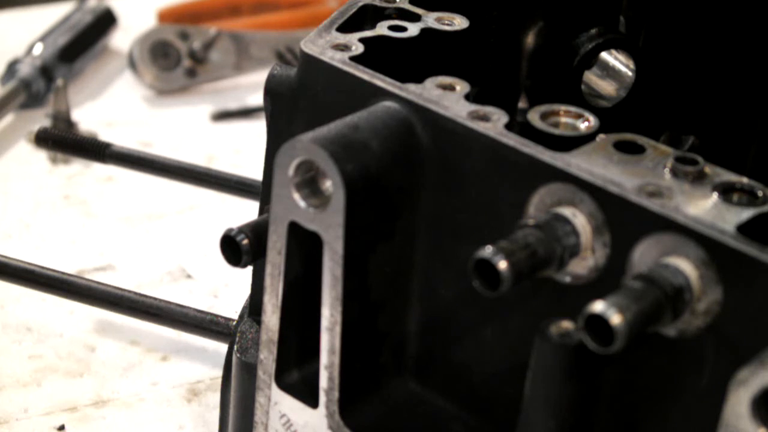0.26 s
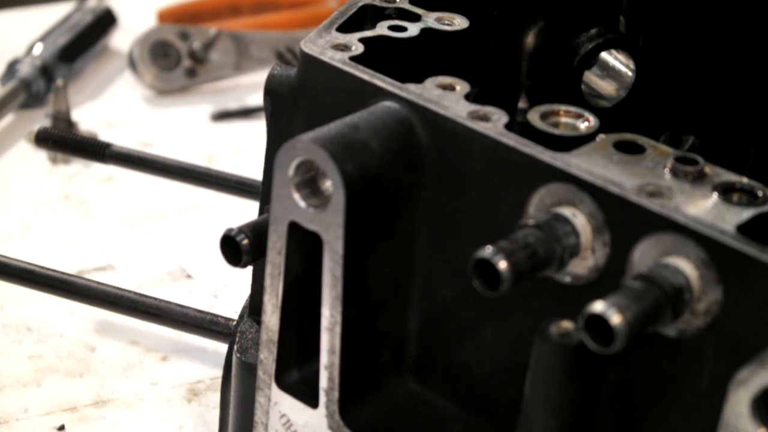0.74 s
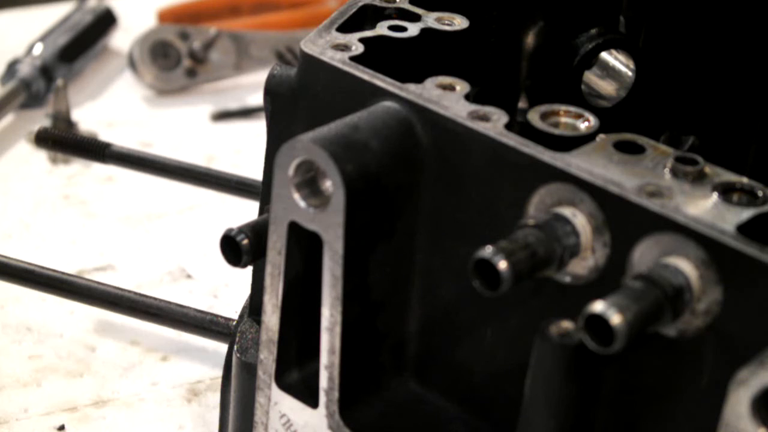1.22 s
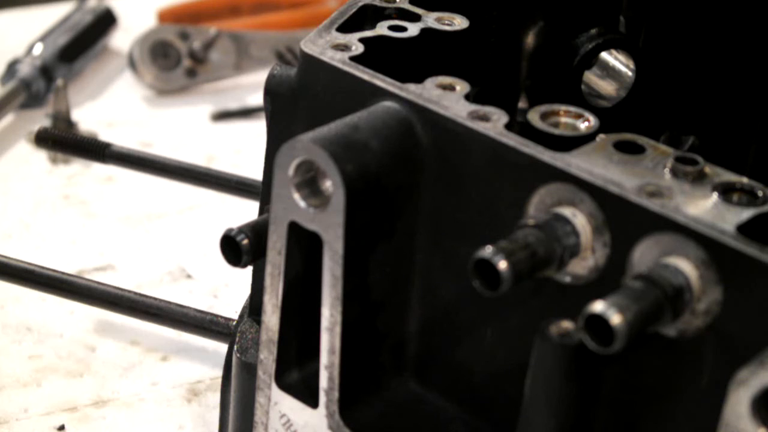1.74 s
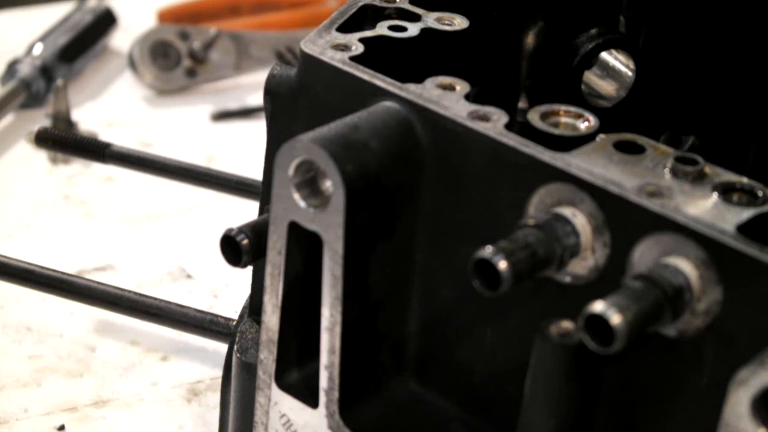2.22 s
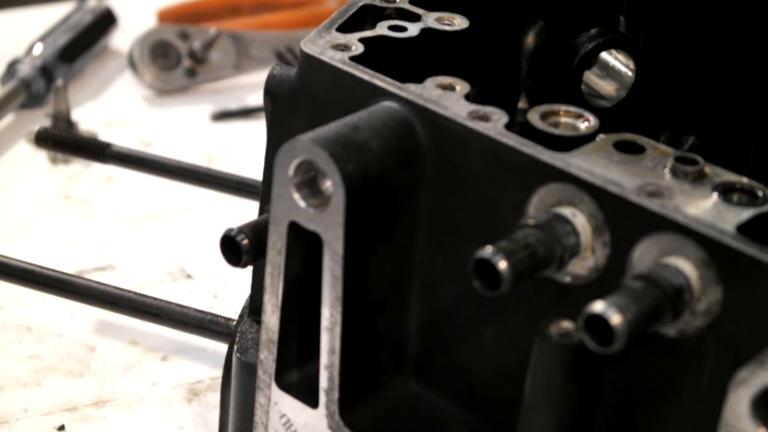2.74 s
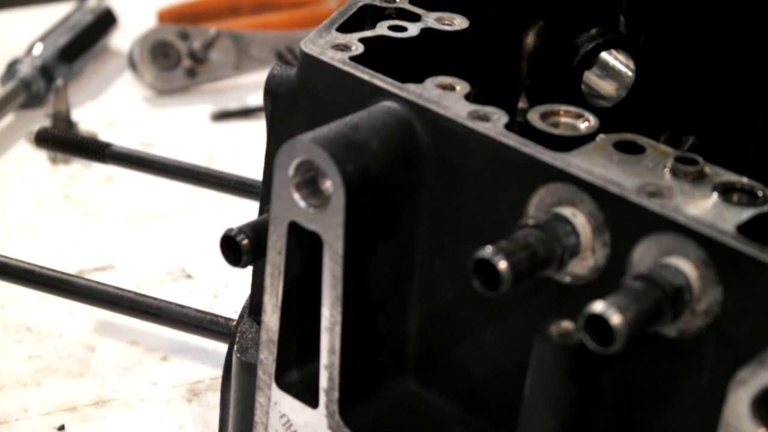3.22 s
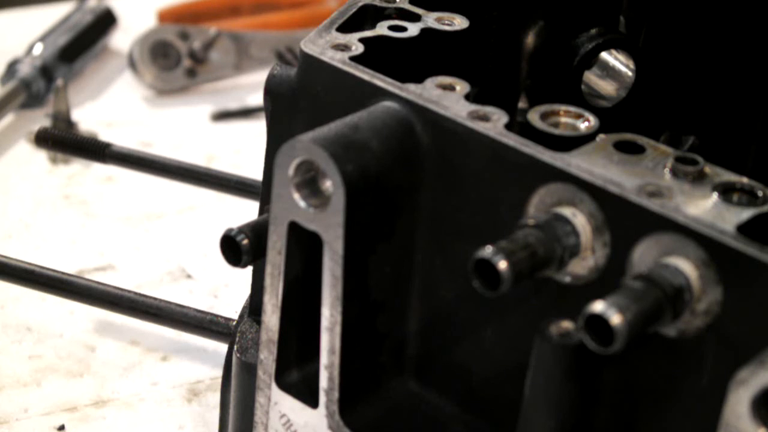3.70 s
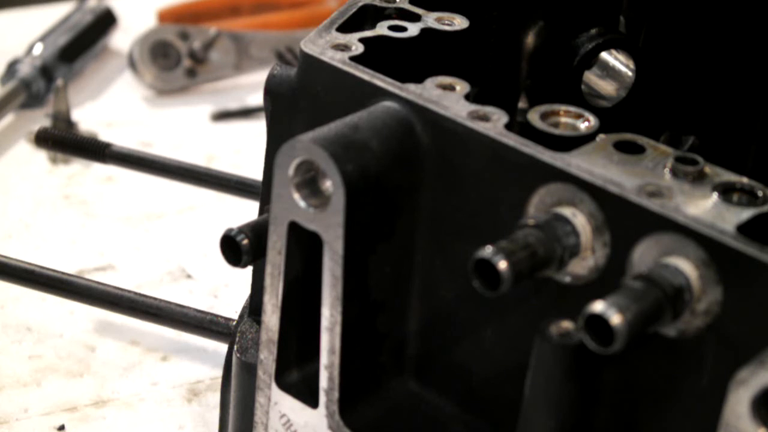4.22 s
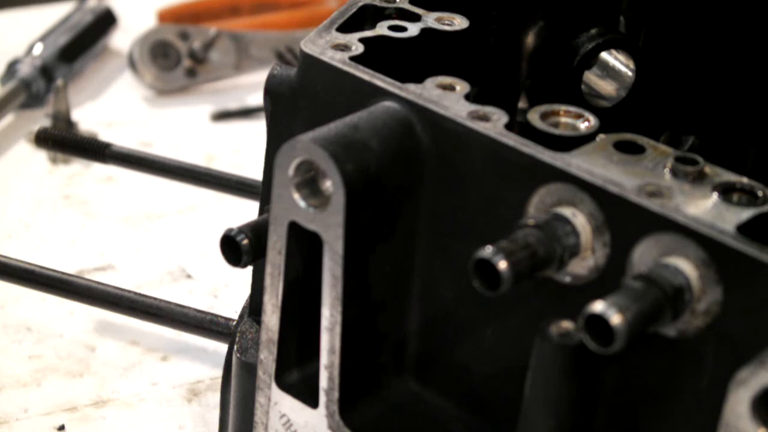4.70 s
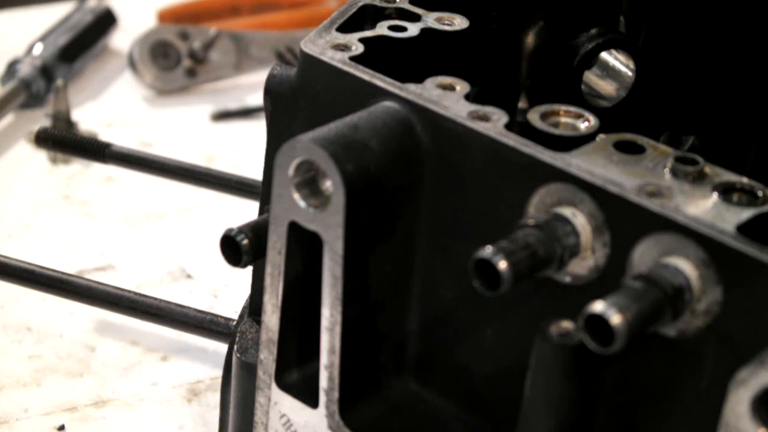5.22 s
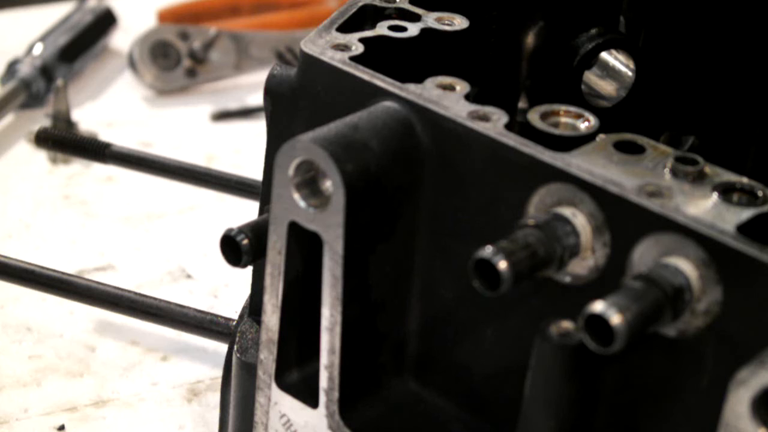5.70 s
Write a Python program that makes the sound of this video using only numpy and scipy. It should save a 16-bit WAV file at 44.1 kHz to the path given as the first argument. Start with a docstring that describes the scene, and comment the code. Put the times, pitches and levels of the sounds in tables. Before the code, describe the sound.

Steel hand tools tap and slide softly on a wooden workbench, then a wrench is struck and a heavy tool lands with a loud, booming clatter that sets loose sockets ringing very high. Light handling follows, then sharper knocks and scrapes, and a last clatter rings the sockets again. Close stereo sound in a small garage, over low rumble and faint hiss.

```python
"""A workbench in a small garage, heard close up on a stereo microphone, over low rumble and faint hiss.
Steel tools tap and slide from 1 s. Near 1.7 s a wrench is struck and a heavy tool lands: the boards
boom and loose sockets chatter and ring very high. Light handling follows, then sharper knocks and
scrapes from about 4 s, and near 5.7 s a last clatter sets the sockets ringing again.
The hard walls answer each blow."""
import sys
import numpy as np
from scipy import signal
from scipy.fft import rfft, irfft, next_fast_len
from scipy.io import wavfile
from scipy.ndimage import map_coordinates

SR = 44100
rng = np.random.default_rng(int(sys.argv[2]) if len(sys.argv) > 2 else 0)


def digitize_waveform(pressure):
    """Quantize a signal to 16-bit integers and store it at the path in sys.argv[1].

    Rows of a 2-D input are taken as channels; values are limited to [-1, 1].
    """
    field = np.atleast_2d(pressure).T
    bounded = np.clip(field, -1, 1)
    quanta = np.round(bounded * 32767).astype(np.int16)
    wavfile.write(sys.argv[1], SR, quanta)


N = 262395

# Colour of a knock on wood: frequency_hz, gain_db
KNOCK_COLOUR = [(170, 6), (470, 5), (1100, 0), (2800, -7.5), (6400, -8), (11500, -14)]
# Tools on the bench; heavier reaches lower, harder higher: start_s, level_db, chatter_s, low_hz, high_hz
TOOL_KNOCKS = [(1.07, -10.5, 0.0034, 1960, 3920), (1.146, -16.5, 0.0062, 725, 14100),
               (1.665, 17.5, 0.017, 470, 12900), (1.776, 15.5, 0.014, 480, 7560),
               (1.7824, 17.5, 0.0092, 110, 18000), (1.812, 12, .075, 500, 3940),
               (1.9621, 10.5, 0.012, 730, 5260), (2.022, -5.5, 0.0096, 584, 4570),
               (2.221, -2, 0.024, 371, 3260), (3.012, -18.5, 0.0036, 1470, 6900),
               (3.269, -11.5, 0.0079, 478, 5600), (3.556, -14, 0.0077, 860, 5600),
               (3.9264, 4, .0016, 1240, 5400), (4.136, -15.5, 0.0039, 517, 5500),
               (4.591, 4, 0.011, 232, 10000), (4.804, 2, .0016, 3680, 4230),
               (4.884, 3.5, 0.0032, 855, 14400), (5.6505, 4.5, 0.0034, 3720, 9400),
               (5.756, -3, 0.0032, 1500, 8000), (5.775, 4.5, .012, 1300, 6200),
               (5.8896, -0.5, 0.00096, 470, 8000)]
def knocks():
    """Tools land on the bench; weight and hardness set the band that each blow excites."""
    out, hz = np.zeros((2, N)), np.geomspace(100, 15000, 24)
    for start_s, level_db, chatter_s, low_hz, high_hz in TOOL_KNOCKS:
        band_db = -10 * np.log10((1 + (low_hz / hz) ** 4) * (1 + (hz / high_hz) ** 4))
        colour = list(zip(hz, level_db + along(KNOCK_COLOUR, hz) + band_db))
        heard = garage(blow(chatter_s, first_s=0.00038), near_db=1, near_s=0.0043, tail_db=3)
        add(out, start_s, bench(heard, colour))
    return out


# Colour of a snap on steel: frequency_hz, gain_db
SNAP_COLOUR = [(200, -21.5), (400, -16), (560, -3), (708, -6), (1020, -0.5), (1630, -3.5), (2420, 1),
               (3120, -5), (4200, -4.5), (5600, -17), (9550, -23), (12100, -24), (15000, -29)]
# Modes of the wrench: pitch_hz, level_db, t60_s
WRENCH_MODES = [(1003, -11.5, .4), (1076, -3.5, .2), (1882, 3.5, 0.21), (1950, 0.5, 0.35), (2070, -4, 0.32),
                (2380, -8, 0.68), (2570, -8, 0.41), (2860, -11.5, 0.74), (3870, -16, 0.23),
                (5040, -10.5, .25)]
# Wrench on steel: start_s, snap_db, ring_db, chatter_s, tilt_db_per_octave
WRENCH_STRIKES = [(1.667, 10.5, -48.5, 0.0048, -6.5), (5.098, 11.5, -60, 0.003, 1),
                  (5.676, 14.5, -64, 0.0038, 1.5), (5.714, -3, -74, 0.0071, -5.5)]
def wrench():
    """Hard steel contacts snap with almost no chatter and leave the wrench ringing briefly."""
    out = np.zeros((2, N))
    for start_s, snap_db, ring_db, chatter_s, tilt in WRENCH_STRIKES:
        taps = blow(chatter_s, first_s=0.0004)
        snap = garage(taps, near_db=0, near_s=0.0063, tail_db=-2)
        colour = [(hz, snap_db + db + tilt * np.log2(hz / 2000)) for hz, db in SNAP_COLOUR]
        add(out, start_s, bench(snap, colour))
        drive = garage(taps, near_db=12, near_s=0.0035, tail_db=-17.5)
        ring = sum(amp(db) * ringing(drive, hz, t60_s) for hz, db, t60_s in WRENCH_MODES)
        add(out, start_s, amp(ring_db) * ring)
    return out


# Modes of the loose sockets: pitch_hz, level_db, t60_s
SOCKET_MODES = [(7591, 0, .25), (7752, -14, .4), (8639, 1, .65), (9600, -9, .68), (9887, 0, .22),
                (10320, -10, .18), (10440, -11, .2), (10740, -13, .3), (10960, -4, .25), (11100, -2, .28),
                (11360, -10, .25), (11475, -3, .17), (13265, -2, .22), (13460, -7, .15), (13835, -1, .29),
                (14030, -4, .25), (14390, -9, .16)]
# Sockets touching: start_s, level_db, chatter_s, brightest_hz, spread_hz
SOCKET_TOUCHES = [(1.829, -52, 0.09, 12400, 1500), (1.849, -52.5, .014, 7600, 300),
                  (1.868, -50, 0.032, 9230, 450), (1.891, -48, .01, 13040, 500),
                  (1.894, -48, 0.021, 10480, 700), (3.012, -67.5, .0038, 13250, 150),
                  (5.755, -47.5, 0.014, 12430, 1290), (5.774, -48.5, .0067, 10280, 600)]
def sockets():
    """Sockets buzz while pressed together, then ring free; where they touch decides which modes sound."""
    out, t = np.zeros((2, N)), np.arange(SR) / SR
    for start_s, level_db, chatter_s, brightest_hz, spread_hz in SOCKET_TOUCHES:
        taps = contacts(np.exp(-t / chatter_s), per_second=3000, scatter_db=0.5)
        heard = garage(taps, near_db=9.5, near_s=0.0031, tail_db=-1)
        for hz, mode_db, t60_s in SOCKET_MODES:
            share = np.exp(-0.5 * ((hz - brightest_hz) / spread_hz) ** 2)
            if share > 0.01:
                buzz_db = -7.5 + 21.5 * np.log2(hz / 12000)  # the high modes buzz most
                buzz = amp(buzz_db) * ringing(heard, hz, t60_s=0.1)
                free_ring = ringing(heard, hz, t60_s)
                add(out, start_s, amp(level_db + mode_db) * share * (free_ring + buzz))
    return out


# Colour of steel scraping the bench: frequency_hz, gain_db
SLIDE_COLOUR = [(170, 3.5), (470, 1.5), (1100, 3), (2800, -10.5), (6400, -10.5), (11500, -14.5)]
# Tools pushed along: fastest_s, half_length_s, level_db, tilt_db_per_octave
TOOL_SLIDES = [(1.006, 0.037, -24, 3.5), (1.545, 0.057, -13.5, -1), (3.216, 0.076, -15.5, .6),
               (4.31, 0.033, -18, -1.5), (4.624, .022, 6, 4), (4.77, .07, -19, 3), (4.885, .005, -3, 3.5),
               (4.985, 0.078, -7.5, 1.5)]
def slides():
    """Steel catches on the bench in dense grains that swell and fade with the push."""
    out = np.zeros((2, N))
    for fastest_s, half_s, level_db, tilt in TOOL_SLIDES:
        grains = contacts(push(half_s), per_second=3500, scatter_db=2.5)
        heard = garage(grains, near_db=0.5, near_s=0.0032, tail_db=0)
        colour = [(hz, level_db + db + tilt * np.log2(hz / 1100)) for hz, db in SLIDE_COLOUR]
        add(out, fastest_s - 3 * half_s, bench(heard, colour))
    return out


LANDING_S = 1.779
# Modes of the bench top: pitch_hz, level_db, t60_s
BOARD_MODES = [(137.6, -14, 1), (166.6, -13.5, 0.82), (291, -8, 0.44), (329, -13.5, 0.59), (692, -4, 0.49),
               (738, 6, 0.15)]
def boards():
    """The low modes of the bench top boom under a heavy landing, centred between left and right."""
    out, t = np.zeros((2, N)), np.arange(SR) / SR
    boom = sum(amp(db - 60 * t / t60_s) * np.sin(2 * np.pi * (hz * t + rng.random()))
               for hz, db, t60_s in BOARD_MODES)
    attack = 1 - np.exp(-t / 0.0021)
    add(out, LANDING_S, np.tile(amp(-20.5) * boom * attack, (2, 1)))
    return out


# Hollow notes of the nudged bench: peak_s, level_db comes last, after the pitch
BENCH_NUDGES = [(1.157, 201, -64), (1.199, 142.4, -59), (1.348, 250.4, -65.5), (2.19, 445, -62.5),
                (3.282, 445, -68), (3.94, 455, -67.5), (4.273, 450.4, -70), (4.604, 493.7, -53.5)]
def nudges():
    """A soft rubbing push swells one low resonance of the bench and lets it go."""
    out = np.zeros((2, N))
    for peak_s, pitch_hz, level_db in BENCH_NUDGES:
        half_s = 4.5 / pitch_hz  # slower pushes wake lower notes
        rub = push(half_s) * diffuse(ECHO_LIKENESS, SR)
        soft_rub = filtered(rub, lambda hz: 1 / (1 + (hz / (2 * pitch_hz)) ** 4))
        add(out, peak_s - 3 * half_s, amp(level_db) * ringing(soft_rub, pitch_hz, t60_s=0.17))
    return out


def blow(chatter_s, first_s):
    """A first impact worth first_s of chatter, then the tool chatters to rest."""
    t = np.arange(SR // 4) / SR
    taps = contacts(np.exp(-t / chatter_s), per_second=5500, scatter_db=0) * np.sqrt(chatter_s / first_s)
    taps[0] += 1
    return taps / np.linalg.norm(taps)


def push(half_s):
    """A bell-shaped force that peaks three half lengths in."""
    t = np.arange(SR) / SR
    return np.exp(-(t / half_s - 3) ** 2)


def contacts(force, per_second, scatter_db):
    """Tiny random impacts sized by a force curve; total energy 1."""
    n = len(force)
    hits = (rng.random(n) < per_second / SR) * rng.choice([-1, 1], n)
    taps = hits * amp(scatter_db * rng.standard_normal(n)) * force
    return taps / (np.linalg.norm(taps) + 1e-12)


# Resonances and gaps of bench and tools: centre_hz, width_hz, gain_db
BENCH_RESONANCES = [(313, 16, 9.5), (356, 8.2, -6.5), (449, 26, 7.5), (584, 10, 4), (650, 64, -1),
                    (1010, 34, 4.5), (1172, 38, 3.5), (1303, 44, 3.5), (1576, 100, -8.5), (1810, 11, 1),
                    (2000, 8.4, 3.5), (2646, 180, 3), (3180, 78, -5.5), (3870, 260, 2), (4770, 230, -4.5),
                    (5170, 100, 3.5)]
def bench(x, colour):
    """Shape a contact by its broad colour and the bench resonances, with no deep bass."""
    hz = np.fft.rfftfreq(SR, 1 / SR)
    db = along(colour, hz)
    for centre_hz, width_hz, gain_db in BENCH_RESONANCES:
        db += gain_db * np.exp(-0.5 * ((hz - centre_hz) / width_hz) ** 2)
    # each point of contact favours different small modes
    db += 2.2 * map_coordinates(rng.standard_normal(SR // 80), [hz / 45]) - 0.6
    low_cut = 1 / np.sqrt(1 + (150 / (hz + 1)) ** 8)
    # minimum phase, so nothing sounds ahead of the contact
    cepstrum = irfft(np.log(amp(db) * (low_cut + 0.014) + 1e-6), SR)
    fold = np.r_[1, np.full(SR // 2 - 1, 2), np.zeros(SR - SR // 2)]
    response = irfft(np.exp(rfft(cepstrum * fold)), SR)
    return signal.fftconvolve(x, response[None, :SR // 8], axes=1)


# Left-right agreement of echoes at the microphone: frequency_hz, likeness
ECHO_LIKENESS = [(100, 0.97), (500, 0.94), (1000, 0.79), (2000, 0.49), (4000, 0.11), (8000, .15),
                 (14000, 0.086)]
# Decay between the hard walls: frequency_hz, t60_s
GARAGE_DECAY = [(150, 0.81), (500, 0.46), (1400, 0.45), (3700, 0.42), (9000, 0.37), (15000, 0.19)]
def garage(taps, near_db, near_s, tail_db):
    """Direct taps reach the microphone with quick echoes off nearby surfaces and the room's tail."""
    power = np.pad(taps, (0, SR - len(taps))) ** 2  # echoes add up in energy
    hz, t, noise = signal.stft(diffuse(ECHO_LIKENESS, SR), SR, nperseg=256)
    frame_energy = np.bincount(np.arange(SR) // 128 + 2, power)  # the walls answer two frames late
    decay = amp(-120 * t / along(GARAGE_DECAY, hz)[:, None])
    room_energy = signal.fftconvolve(frame_energy[None], decay, axes=1)[:, :len(t)]
    tail = signal.istft(noise * np.sqrt(abs(room_energy)), SR, nperseg=256)[1][:, :SR]
    near_energy = signal.lfilter([1], [1, -np.exp(-2 / (near_s * SR))], power)
    near = diffuse(ECHO_LIKENESS, SR) * np.sqrt(near_energy)
    heard = (amp(near_db) * unit(near) + amp(tail_db) * unit(tail)) / np.sqrt(SR)
    heard[:, :len(taps)] += taps
    return unit(heard) / np.sqrt(SR)


# Colours of the building's rumble and of the hiss: frequency_hz, gain_db
RUMBLE_COLOUR = [(12, -32.5), (20, 3), (43, -1.5), (65, -12), (92, -8.5), (156, -10), (202, -14),
                 (221, -23.5), (330, -37), (430, -56), (730, -120)]
HISS_COLOUR = [(150, -29), (250, -3.5), (371, -8.5), (404, -1), (433, -8.5), (774, -11), (1020, -12.5),
               (1390, -15), (1590, -23.5), (1990, -15), (3270, -20), (3620, -18.5), (11000, -20),
               (15000, -21.5)]
# Drifting base level under both: time_s, level_db
ROOM_TONE_DRIFT = [(0.15, -65), (0.65, -68.5), (1.42, -70), (2.5, -67), (3.45, -73.5), (3.83, -73.5),
                   (4.2, -68), (4.5, -70), (5.45, -65.5)]
def room_tone():
    """A lumpy low rumble of the building and a soft, wide hiss drift up and down together."""
    t = np.arange(N) / SR
    drift_db = np.interp(t, *np.transpose(ROOM_TONE_DRIFT))
    lumps_db = 1.7 * map_coordinates(rng.standard_normal(100), [t * 12], mode="mirror")
    narrow = diffuse([(30, 0.86), (150, 0.82)], N)
    rumble = unit(filtered(narrow, lambda hz: amp(along(RUMBLE_COLOUR, hz))))
    wide = diffuse([(300, 0.36), (1500, 0.2), (5000, 0.3), (12000, 0.29)], N)
    hiss = unit(filtered(wide, lambda hz: amp(along(HISS_COLOUR, hz))))
    # the heavy landing shakes the bench and swells the rumble
    shake_db = 7 * (t > LANDING_S) * np.exp(-abs(t - LANDING_S) / 0.2)
    return amp(drift_db) * (amp(17.5 + shake_db + lumps_db) * rumble + amp(8) * hiss)


def diffuse(likeness, size):
    """Stereo noise whose sides agree as much as the (frequency_hz, likeness) points say."""
    def mid_side_gains(hz):
        angle = np.arccos(np.clip(along(likeness, hz), -1, 1)) / 2
        return np.array([np.cos(angle), np.sin(angle)])
    mid, side = filtered(rng.standard_normal((2, size)), mid_side_gains)
    return np.array([mid + side, mid - side])


def ringing(x, hz, t60_s):
    """One mode driven by x, scaled to rms 1."""
    pole = amp(-60 / (t60_s * SR)) * np.exp(2j * np.pi * hz / SR)
    return unit(signal.lfilter([1], [1, -pole], x).real)


def amp(db):
    """Decibels to gain."""
    return 10 ** (np.asarray(db) / 20)


def unit(x):
    """Scale to rms 1."""
    return x / np.sqrt(np.mean(x ** 2) + 1e-20)


def along(points, hz):
    """Read (frequency_hz, value) points on a log axis."""
    point_hz, values = np.transpose(points)
    return np.interp(np.log(hz + 1), np.log(point_hz + 1), values)


def filtered(x, response):
    """Filter x by a function of frequency."""
    n = x.shape[-1]
    padded = next_fast_len(n + SR // 4)
    return irfft(rfft(x, padded) * response(np.fft.rfftfreq(padded, 1 / SR)), padded)[..., :n]


def add(track, start_s, sound):
    """Mix a sound into the track."""
    start = max(round(start_s * SR), 0)
    track[:, start:start + sound.shape[-1]] += sound[:, :N - start]


def microphone_sides(hz):
    """The left side of the microphone hears the bench a little sooner, the right a little louder."""
    left_lead_s = 3.6e-5
    right_over_left_db = along([(200, 1.6), (4000, 2.1), (8000, 0.088), (14000, 0.3)], hz)
    side = np.array([[-0.5], [0.5]])
    return np.exp(-2j * np.pi * hz * left_lead_s * side) * amp(right_over_left_db * side)


def scene():
    """The tools and the room tone as they reach the microphone."""
    tools = knocks() + wrench() + slides() + nudges() + boards() + sockets()
    return filtered(tools + room_tone(), microphone_sides)


def record(dry):
    """The recorder keeps nothing above its band limit."""
    limit_hz = 14850
    return filtered(dry, lambda hz: 1 / np.sqrt(1 + (hz / limit_hz) ** 200))


dry = scene()
out = record(dry)
digitize_waveform(out)
```